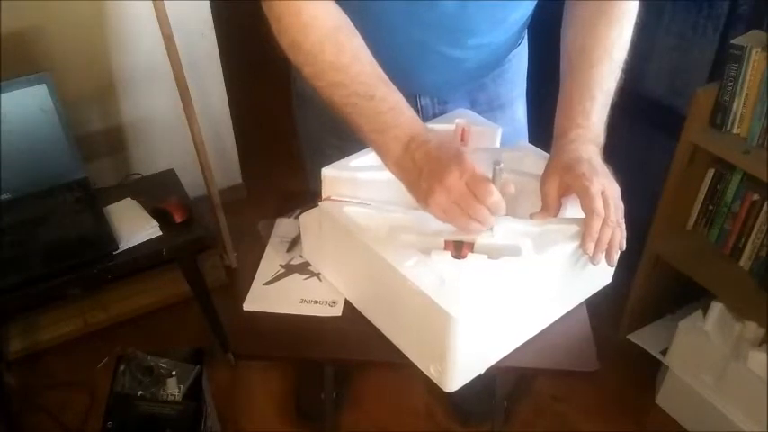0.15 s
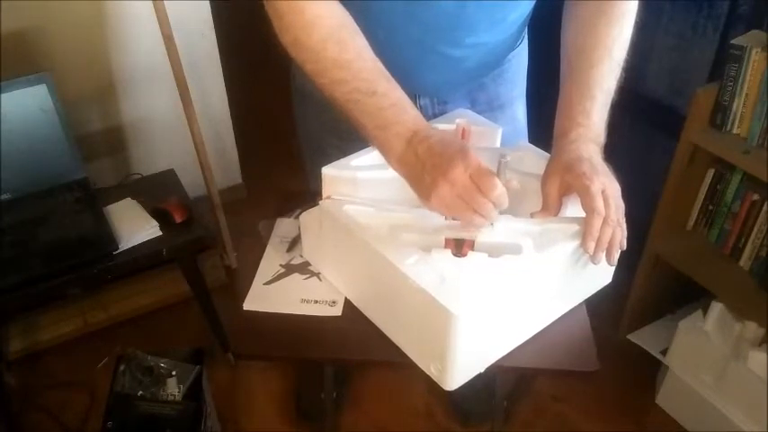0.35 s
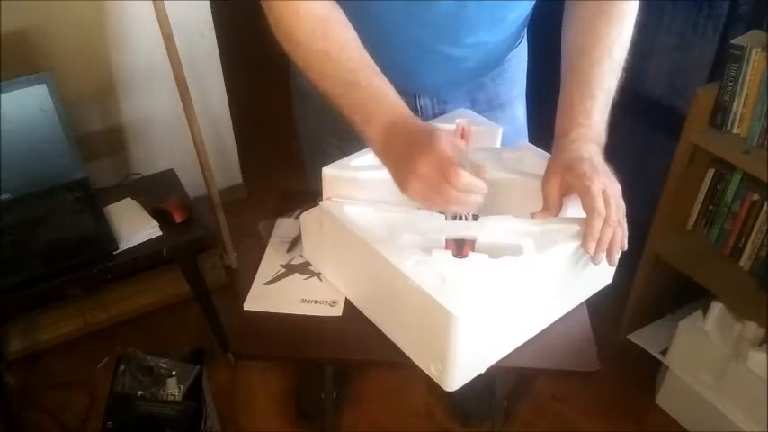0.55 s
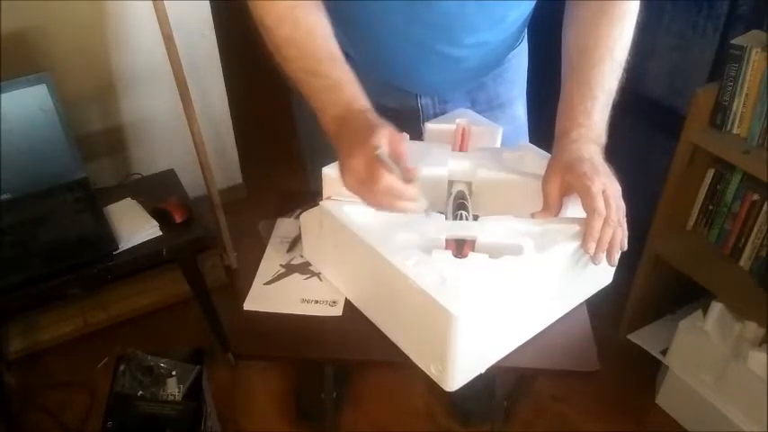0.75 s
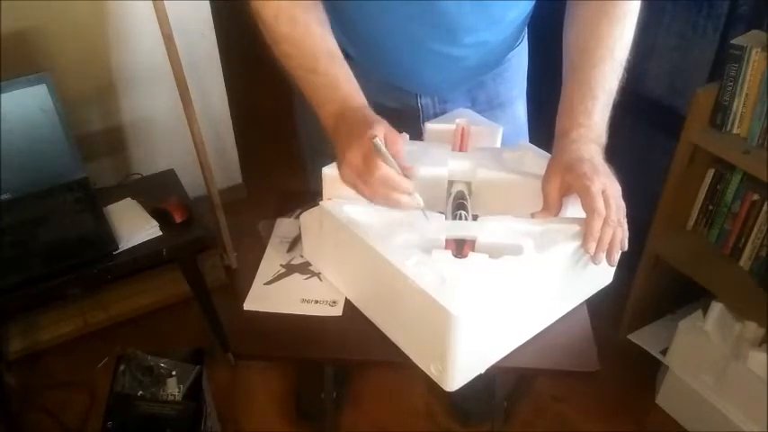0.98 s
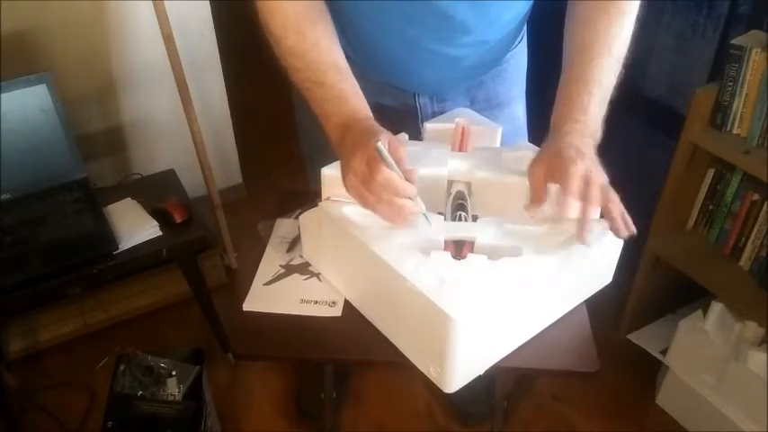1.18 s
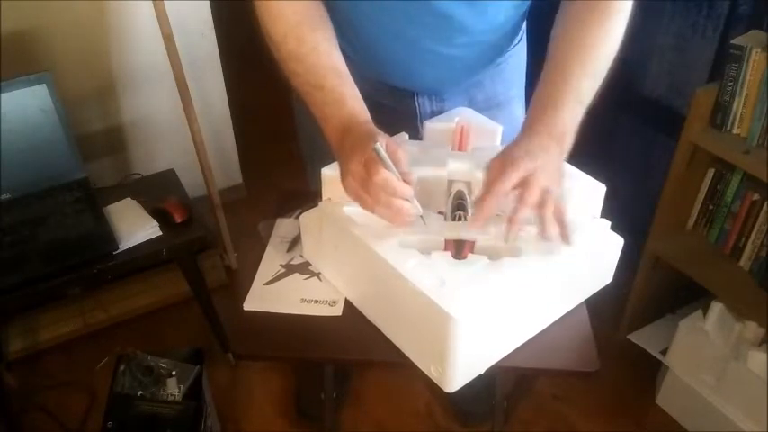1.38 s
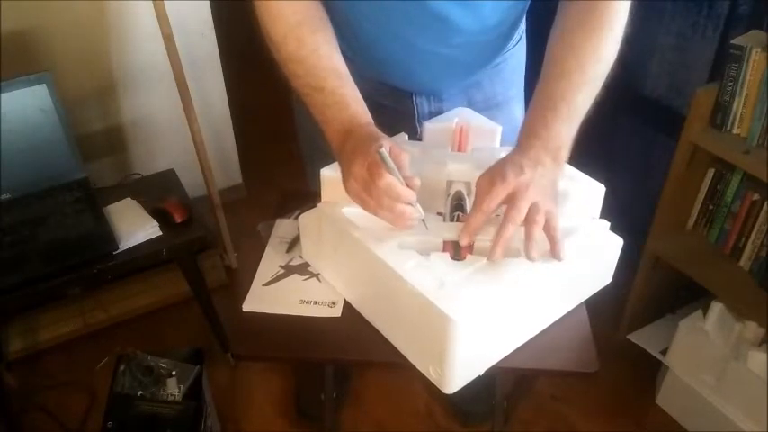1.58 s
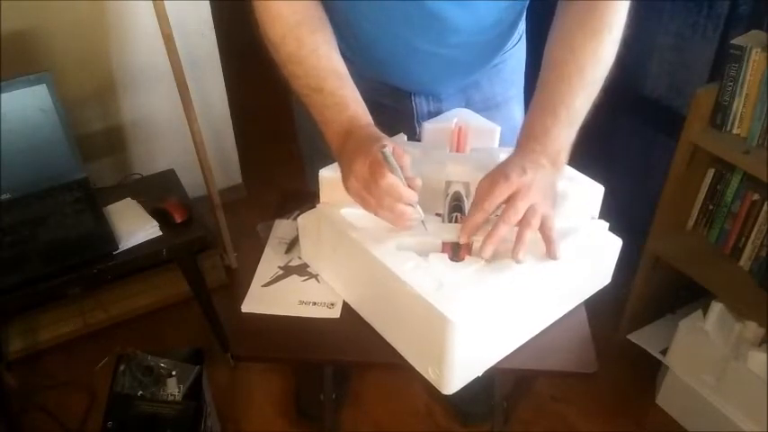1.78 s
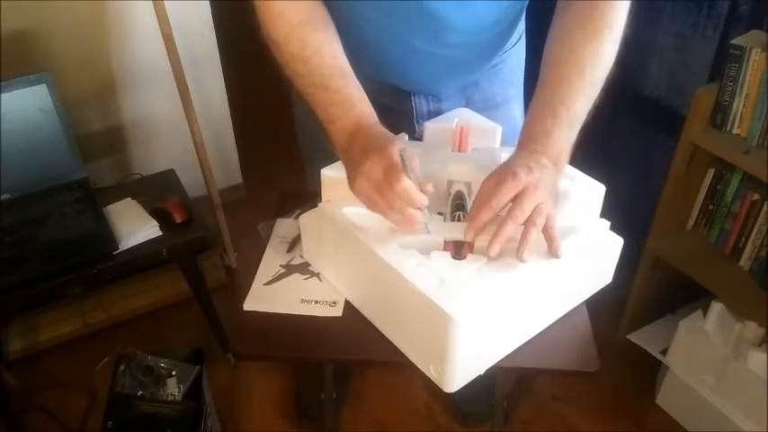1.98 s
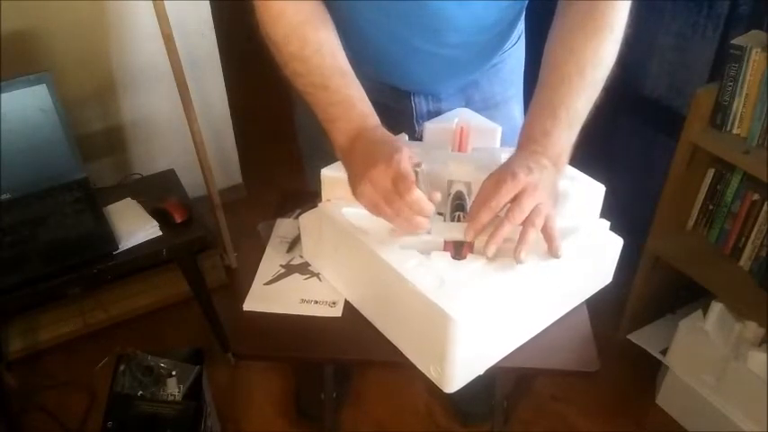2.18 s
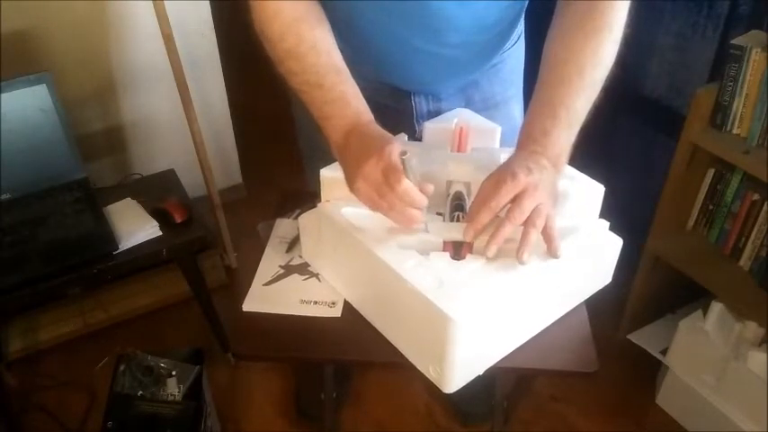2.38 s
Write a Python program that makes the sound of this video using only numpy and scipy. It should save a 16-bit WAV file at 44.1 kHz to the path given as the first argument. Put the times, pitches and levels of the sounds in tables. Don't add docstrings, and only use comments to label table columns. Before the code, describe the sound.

Blade scratching and snapping through packing tape on a hollow foam box in a small room

```python
import sys
import numpy as np
from scipy import signal
from scipy.fft import rfft, irfft
from scipy.io import wavfile
from scipy.ndimage import uniform_filter1d

SR = 44100
rng = np.random.default_rng(int(sys.argv[2]) if len(sys.argv) > 2 else 0)


def how_loud(loudness_db):
    steps = np.asarray(loudness_db, float) / 20
    return 10 ** steps


def transcribe(signal):
    frames = np.atleast_2d(signal).T
    limited = np.clip(frames, -1, 1)
    pcm = np.round(limited * 32767).astype(np.int16)
    wavfile.write(sys.argv[1], SR, pcm)


N = 108045

# [f/Hz, level per Hz/dB]
HUSH_SPECTRUM = [(20, -34), (90, -34), (160, -22.5), (420, -3), (1000, -4.5), (2600, -14.5), (4000, -22),
                 (16000, -28.5)]
# [start t/s, length t/s, level/dB, favoured ring f/Hz, tilt/dB per octave]
BLADE_DRAGS = [(0.184, 0.065, -61, 2200, -3.5), (0.238, 0.067, -67, 1000, 1),
               (0.355, 0.11, -58, 1020, -1.5), (0.385, 0.06, -53, 1800, -2), (0.437, 0.14, -61, 1010, -3),
               (0.551, 0.03, -39, 2130, -2), (0.508, 0.058, -59.5, 2600, -2),
               (0.853, 0.12, -79, 483, -29.5), (1.106, 0.072, -67, 1930, -4), (1.162, .11, -58.5, 1980, -3),
               (1.28, 0.04, -63.5, 570, -6), (1.46, 0.097, -68.5, 1770, -4), (1.54, 0.079, -59.5, 1070, -4),
               (1.711, 0.098, -64, 1050, -4), (1.849, 0.055, -66.5, 1080, -3.5),
               (1.941, 0.065, -64, 1150, -1.5), (1.992, 0.035, -57, 1180, -0.5),
               (2.033, 0.073, -54.5, 796, -1), (2.117, 0.026, -62.5, 1300, -2.5),
               (2.26, 0.035, -53, 970, -1), (2.388, 0.071, -72, 945, -7)]
# [f/Hz, level/dB, t60 t/s]
FOAM_RINGS = [(280, -14, .04), (550, -5, .03), (690, -7, .025), (800, -2, .025), (960, 0.5, .03),
              (1080, 0.5, .03), (1330, -3, .02), (1590, -5, .012), (1800, -3, .015), (2500, -5, .008),
              (3150, -8, .006), (4500, -7, .007), (6100, -7, .006), (7000, -9, .006)]
# [f/Hz, t60 t/s]
ROOM_DECAY = [(250, 0.31), (600, 0.33), (1500, 0.19), (4000, 0.2), (10000, 0.16)]
# [t/s, level/dB, favoured ring f/Hz, tilt/dB per octave, burst t/ms]
TAPE_SNAPS = [(.221, -31, 940, -4, 2.03), (.329, -36.5, 1010, -4, 3.7), (.395, -36, 2500, -2.5, 10.9),
              (0.415, -38, 1800, -4, 4.3), (.422, -41, 1840, -8, 2.27), (0.439, -44, 6000, -3.5, 2.7),
              (0.544, -33, 2590, 0, 4.5), (0.556, -34, 2800, -1, 12.3), (.576, -25, 966, -3, 4.12),
              (1.285, -51, 3000, -0.5, 7.6), (.562, -29.5, 2800, -1, 6.1), (.568, -42, 2200, -8, 4.3),
              (1.534, -35, 1080, -5.5, 6.1), (1.613, -20.5, 1560, -3, 3.2), (1.625, -32, 806, -5, 2.8),
              (1.750, -46.5, 1780, -2, 9.3), (1.835, -46, 4400, 2, 6.8), (1.908, -44, 1500, -5.5, 3.06),
              (1.96, -44.5, 2500, -4.5, 1.6), (2.017, -22.5, 1000, -5, 6.5), (2.125, -38, 1270, -4, 1.24),
              (2.235, -45.5, 970, -3.5, 5.1), (2.268, -37, 1480, -4.5, 2.3)]
# [t/s, f/Hz, level/dB]
HOLLOW_KNOCKS = [(0.226, 280, -51), (.226, 530, -47), (1.195, 680, -36), (1.277, 510, -50),
                 (1.281, 324, -51), (1.534, 2800, -39), (1.536, 1100, -33), (1.617, 282, -58),
                 (1.620, 550, -31.5), (2.019, 190, -80), (2.024, 410, -57), (2.024, 810, -50),
                 (2.27, 232, -67.5)]
# [t/s, level/dB]
TABLE_THUMPS = [
    (.557, -14),
    (1.612, 0),
    (2.017, 0.5),
    (2.125, -13),
    (2.268, -11),
]
# [start t/s, end t/s, f/Hz, level/dB]
CAMERA_WHINE = [
    (1.19, 1.3, 14002, -93),
    (1.3, 2.34, 14998, -91),
    (2.34, 2.5, 14002, -93),
]
# [t/s, level/dB]
BLADE_TICKS = [
    (1.380, -48.5),
    (1.383, -41.5),
    (1.462, -56),
]
# [f/Hz, level/dB, t60 t/s]
BLADE_RINGS = [(2500, -0.5, 0.003), (2940, -2, 0.007), (3700, -6.5, .004), (4300, 3, 0.0034),
               (4800, -3, 0.0017)]
# [f/Hz, level/dB]
BOX_TONE = [(250, -3.5), (500, 5.8), (800, -4.5), (1050, 6), (1400, 0), (2500, 1.5), (4000, -1),
            (12000, -2.5)]

FAVOUR_DB, FAVOUR_OCT = 7, 0.32
RING_SCATTER_DB = 3.5
CRACK_DB, CRACK_LOW_HZ, CRACK_SHELF_HZ, CRACK_TOP_DB = 4.5, 519, 7430, -10.5
CRACK_MS = 1.5165
SLIP_RANGE_DB = 14.025


def unit(x):
    return x / np.sqrt(np.mean(x ** 2) + 1e-30)


def add(out, x, s):
    i = int(s * SR)
    out[i:i + len(x)] += x[:len(out) - i]


def shaped(x, db_of_hz):
    hz = np.fft.rfftfreq(len(x), 1 / SR) + 1
    return irfft(rfft(x) * how_loud(db_of_hz(hz)), len(x))


def walk(rate_hz):
    k = int(SR / rate_hz)
    return unit(uniform_filter1d(uniform_filter1d(rng.standard_normal(N), k), k))


def ring(hz, db, t60):
    t = np.arange(4096) / SR
    strength = how_loud(db) * (-1) ** np.arange(len(hz))
    modes = np.sin(2 * np.pi * hz[:, None] * t) * how_loud(-60 * t / t60[:, None])
    return strength @ modes


def slips(envelope, rate_per_s):
    n = len(envelope)
    hit = rng.random(n) < rate_per_s / SR
    sign = np.sign(rng.random(n) - 0.5)
    size = how_loud(SLIP_RANGE_DB * (rng.random(n) - 1))
    return envelope * hit * sign * size


def foam(ring_hz, tilt_db):
    def touch_db(f):
        favour = np.exp(-0.5 * (np.log2(f / ring_hz) / FAVOUR_OCT) ** 2)
        return tilt_db * np.log2(f / 1000) + FAVOUR_DB * favour

    hz, db, t60 = np.array(FOAM_RINGS).T
    ring_db = db + touch_db(hz) + RING_SCATTER_DB * rng.standard_normal(len(hz))
    rings = ring(hz * (1 + 0.02 * rng.standard_normal(len(hz))), ring_db, t60)
    f = np.fft.rfftfreq(4096, 1 / SR) + 1
    shelf_db = CRACK_TOP_DB / (1 + (CRACK_SHELF_HZ / f) ** 12)
    low_cut_db = -10 * np.log10(1 + (CRACK_LOW_HZ / f) ** 6)
    bending = np.exp(-4j * np.pi * CRACK_MS * np.sqrt(f / 1000))
    crack = irfft(how_loud(touch_db(f) + shelf_db + low_cut_db) * bending)
    return unit(rings) + how_loud(CRACK_DB) * unit(crack) * (np.arange(4096) < 2048)


def hush():
    hz, db = np.array(HUSH_SPECTRUM).T
    noise = shaped(rng.standard_normal(N), lambda f: np.interp(np.log(f), np.log(hz), db))
    air = how_loud(-67.5) * unit(noise)
    low = signal.sosfilt(signal.butter(2, 3000, fs=SR, output="sos"), air)
    wander_db = 2.04 * walk(9.9)
    return air + low * (how_loud(wander_db) - 1)


def opening_rumble():
    level_db, centre_hz, fade_s = -74, 260, 0.087
    rumble = unit(shaped(rng.standard_normal(N), lambda f: -40 * np.abs(np.log2(f / centre_hz))))
    return how_loud(level_db) * rumble * np.exp(-np.arange(N) / SR / fade_s)


def drags():
    slips_per_s, peak_share = 5000, 0.37
    out, t = np.zeros(N), np.arange(8192) / SR
    for s, length, db, ring_hz, tilt_db in BLADE_DRAGS:
        swell = np.interp(t / length, [0, peak_share, 1], [0, 1, 0])
        sound = signal.fftconvolve(slips(swell, slips_per_s), foam(ring_hz, tilt_db))
        rms = np.sqrt(np.sum(sound ** 2) / (length * SR))
        add(out, how_loud(db) * sound / rms, s)
    return out


def room(x):
    level_db, gap_s, length_s = -1.5, 0.0059, 0.4
    t = np.arange(SR // 2) / SR
    hz, t60 = np.array(ROOM_DECAY).T
    tail = 0
    for centre in 60 * 2 ** np.arange(0, 8.6, 0.5):
        noise = rng.standard_normal(len(t))
        band = shaped(noise, lambda f: np.maximum(-96 * np.log2(f / centre) ** 2, -120))
        tail = tail + band * how_loud(-60 * t / np.interp(np.log(centre), np.log(hz), t60))
    tail = tail * np.clip(t / gap_s, 0, 1) ** 2
    lumps = uniform_filter1d(np.abs(rfft(tail)) ** 2, size=61)
    tail = irfft(rfft(tail) / np.sqrt(lumps), len(tail)) * (t < length_s)
    tail = how_loud(level_db) * tail / np.sqrt(np.sum(tail ** 2))
    return signal.fftconvolve(x, tail)[:N]


def snaps():
    fibres_per_s, rise_s, first_click_db, lead_s = 9900, 0.00057, -5, 0.0008
    near, far, t = np.zeros(N), np.zeros(N), np.arange(2048) / SR
    for s, db, ring_hz, tilt_db, ms in TAPE_SNAPS:
        burst = np.exp(-t / (ms / 1000)) * (1 - np.exp(-t / rise_s))
        first_click = how_loud(first_click_db) * signal.unit_impulse(2048)
        force = slips(burst, fibres_per_s) + first_click
        body = foam(ring_hz, tilt_db)
        sound = signal.fftconvolve(force, body)
        sound = how_loud(db) * sound / np.abs(sound).max()
        add(near, sound, s - lead_s)
        same_energy = np.sqrt(np.sum(sound ** 2) / np.sum(body ** 2))
        add(far, body * same_energy, s + ms / 2000)
    return near, far


def knocks():
    cycles, rise_s = 20, 0.004
    out, t = np.zeros(N), np.arange(8192) / SR
    for s, hz, db in HOLLOW_KNOCKS:
        swell = 1 - np.exp(-t / rise_s)
        add(out, how_loud(db - 60 * t * hz / cycles) * swell * np.sin(2 * np.pi * hz * t), s)
    return out


def thumps():
    hz, level_db, t60_s = 56, -71, 0.086
    out, t = np.zeros(N), np.arange(8192) / SR
    for s, db in TABLE_THUMPS:
        add(out, how_loud(level_db + db - 60 * t / t60_s) * np.sin(2 * np.pi * hz * t), s)
    return out


def whine():
    out, t = np.zeros(N), np.arange(N) / SR
    for start, end, hz, db in CAMERA_WHINE:
        out += how_loud(db + 3) * np.sin(2 * np.pi * hz * t) * (t > start) * (t < end)
    return out


def ticks():
    out, (hz, db, t60) = np.zeros(N), np.array(BLADE_RINGS).T
    for s, level_db in BLADE_TICKS:
        sound = ring(hz, db + RING_SCATTER_DB * rng.standard_normal(len(hz)), t60)
        add(out, how_loud(level_db) * sound / np.abs(sound).max(), s)
    return out


def scene():
    near, far = snaps()
    rest = drags() + ticks() + knocks()
    hz, db = np.array(BOX_TONE).T
    box = near + rest + room(far + rest)
    box = shaped(box, lambda f: np.interp(np.log(f), np.log(hz), db))
    box = signal.sosfilt(signal.butter(4, 216, "high", fs=SR, output="sos"), box)
    background = hush() + opening_rumble() + whine()
    return (box + thumps() + background)[None]


def roll_off(x):
    return signal.sosfilt(signal.butter(12, 16470, fs=SR, output="sos"), x)


def record(dry):
    top_cut = signal.ellip(10, 0.2, 45, 15800, fs=SR, output="sos")
    mix = signal.sosfilt(top_cut, dry)
    return roll_off(mix)


dry = scene()
out = record(dry)
transcribe(out)
```